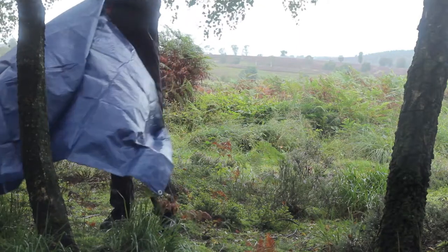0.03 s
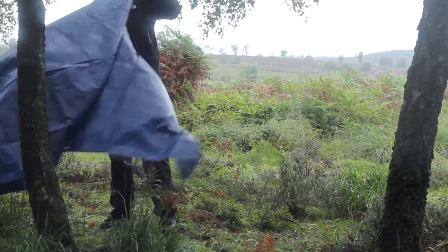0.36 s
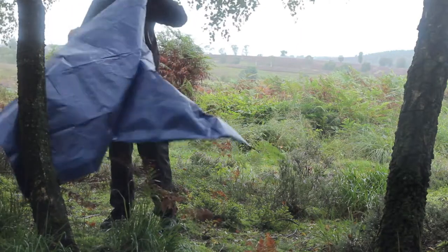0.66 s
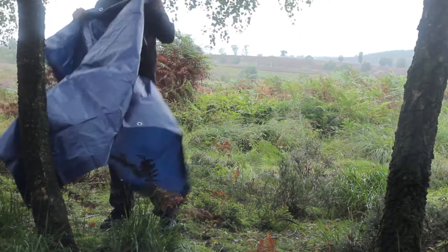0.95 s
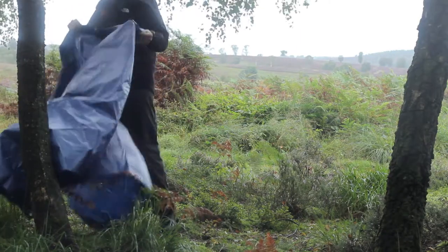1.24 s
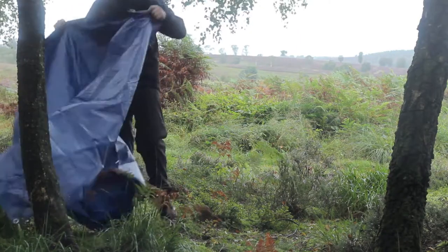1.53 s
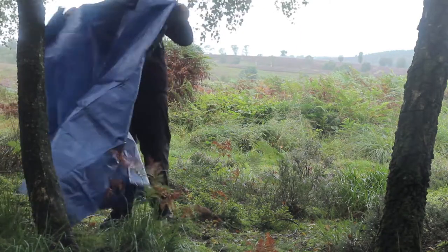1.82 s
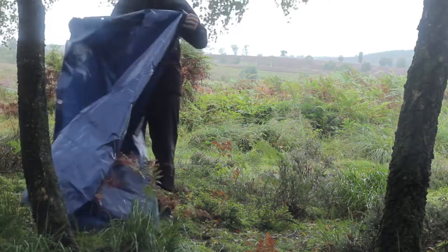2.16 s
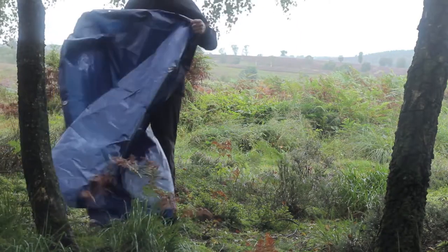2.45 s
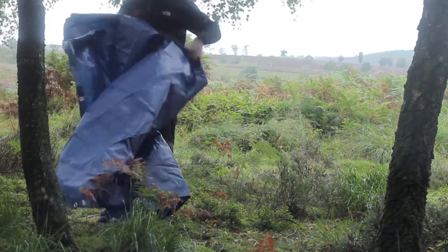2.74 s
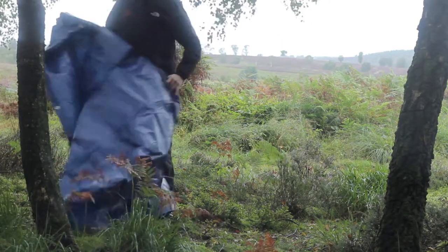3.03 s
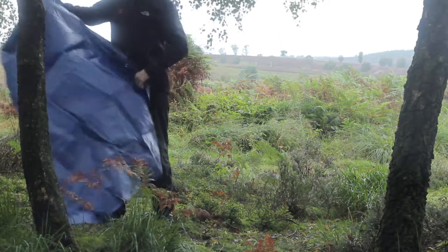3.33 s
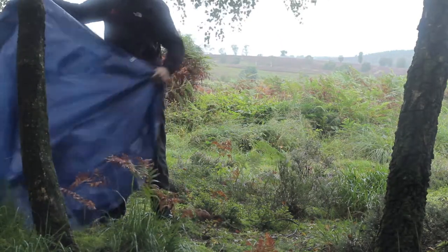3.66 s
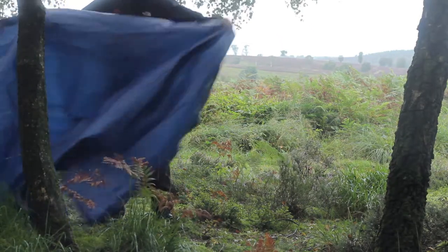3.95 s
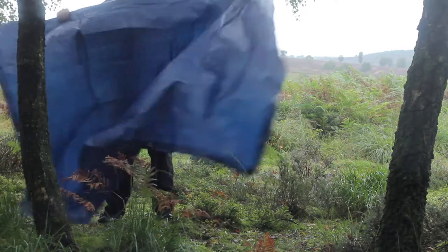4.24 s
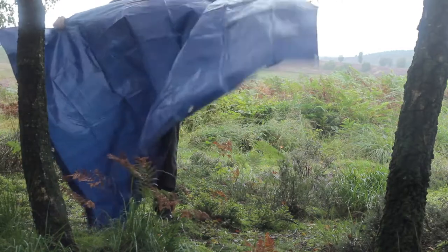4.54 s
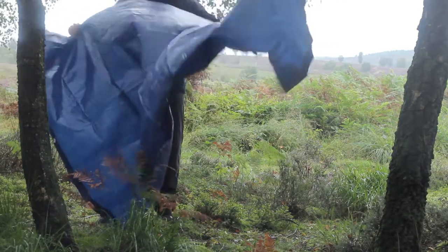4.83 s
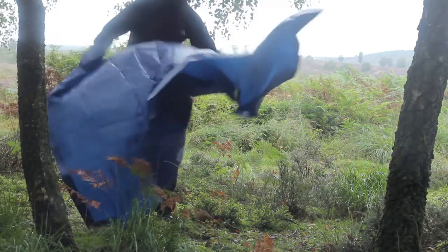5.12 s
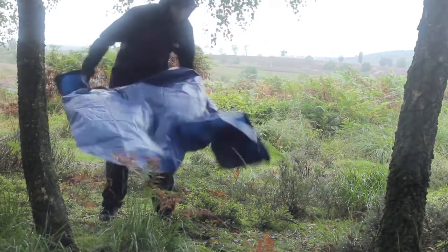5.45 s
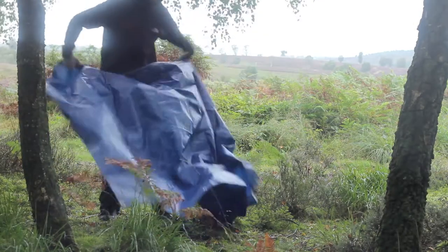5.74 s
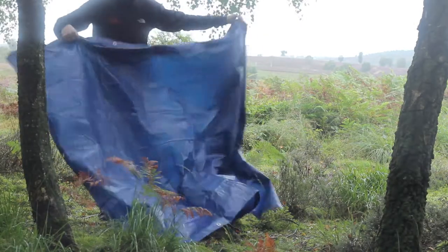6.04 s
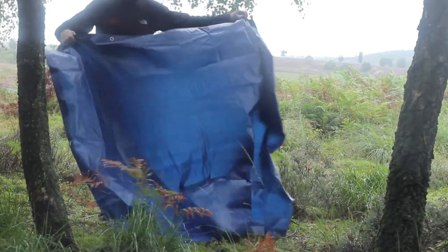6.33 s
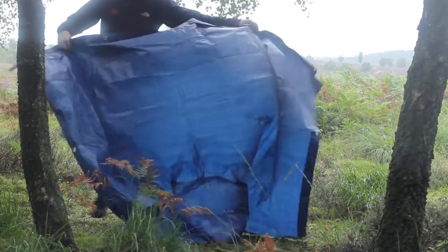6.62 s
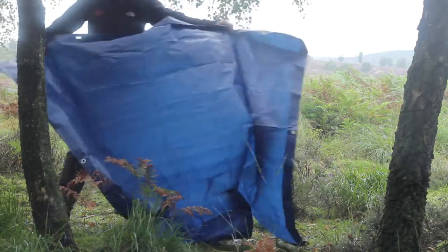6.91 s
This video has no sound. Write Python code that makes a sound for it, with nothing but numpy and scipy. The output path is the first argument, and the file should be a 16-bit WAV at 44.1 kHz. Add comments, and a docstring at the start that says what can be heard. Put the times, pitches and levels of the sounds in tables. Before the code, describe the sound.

A plastic tarp rustles and crackles in irregular swishes as someone pulls and shakes it open a few metres off, its creases giving occasional small snaps. Throughout, wind hits the microphone with a low, uneven rumble and dull thumps, easing briefly early on and growing stronger in the second half. A faint hiss of ferns lies underneath, out in open country.

```python
"""Gusty wind rumbles and thuds on the microphone as eddies hit it, out on an open heath.
A few metres off, a person shakes out a woven plastic tarp: the sheet rasps over itself and its
creases buckle in swarms of tiny clicks, with a few sharper snaps and ticks.
Bracken hisses behind. A fast limiter holds the peaks."""
import sys
import numpy as np
from scipy import signal
from scipy.fft import rfft, irfft, next_fast_len
from scipy.io import wavfile
from scipy.ndimage import uniform_filter1d, minimum_filter1d, map_coordinates

SR = 44100
rng = np.random.default_rng(int(sys.argv[2]) if len(sys.argv) > 2 else 0)


def to_wav(sig):
    """Store sig (one row per channel, or 1-D mono) as 16-bit WAV at the path in sys.argv[1].

    Samples outside -1..1 are clipped; the rate is SR.
    """
    pcm = np.clip(np.atleast_2d(sig), -1, 1) * 32767
    pcm = np.round(pcm).astype(np.int16)
    wavfile.write(sys.argv[1], SR, pcm.T)  # frames by channels


N = 316638

# spectra of ferns, wind rumble and plastic sheet: (frequency [Hz], relative density [dB])
BRACKEN_SPECTRUM = [(100, -36), (400, 11.5), (1000, 11), (2500, -18), (4500, -41), (7000, -13),
                    (15000, -35)]
RUMBLE_SPECTRUM = [(25, -25), (35, -40), (50, -12.5), (70, -3), (100, 0), (140, 0), (200, -2), (280, -7),
                   (400, -13.5), (560, -22.5)]
SHEET_SPECTRUM = [(200, -16), (400, -8.5), (800, -0.5), (1250, 0.5), (1950, -0.5), (2500, 0.5),
                  (3000, -4.5), (3600, -5.5), (4400, -12), (5600, -12.5), (6900, -9), (8300, -14),
                  (10000, -14.5), (15500, -24.5)]
# wind between gusts: (time [s], relative level [dB])
BASE_WIND = [(0.0, -24.5), (0.28, -32.5), (0.85, -23), (0.95, -46.5), (1.05, -43.5), (1.15, -31),
             (1.5, -31), (1.66, -44), (1.79, -45), (2.0, -35.5), (2.42, -33), (2.47, -60), (2.58, -39),
             (2.72, -42), (2.88, -40.5), (2.96, -28), (3.12, -30), (3.35, -22.5), (3.57, -39.5),
             (3.73, -31.5), (4.06, -27.5), (4.17, -31.5), (4.45, -24), (4.93, -30), (5.03, -35),
             (5.12, -26.5), (6.2, -29), (6.57, -32.5), (6.74, -29.5), (7.15, -25)]
# gusts: (start [s], length [s], relative level [dB], small-eddy share [dB])
WIND_GUSTS = [(0.032, 0.18, -23, -10.5), (0.306, 0.025, -21.5, -15.5), (0.41, 0.16, -22, -10),
              (0.645, 0.1, -20.7, -8), (0.76, 0.096, -24.5, -6), (1.068, 0.042, -24, -16.5),
              (1.14, 0.072, -27, -15), (1.208, 0.088, -22, -18), (1.36, 0.11, -23, -12),
              (1.808, 0.033, -25.5, -32), (1.96, 0.0076, -26.5, -13), (2.076, 0.035, -25.5, -24),
              (2.15, 0.1, -33, -19), (2.3, 0.064, -27.5, -13.5), (2.42, 0.018, -28, -15.5),
              (2.602, 0.04, -23.5, -11.5), (2.635, 0.062, -18.5, -12), (2.7, 0.055, -24, -20.5),
              (2.815, 0.028, -23, -19), (2.98, 0.03, -20.5, -12), (3.04, 0.025, -17, -14),
              (3.243, 0.15, -25, -9.5), (3.435, 0.018, -17, -10.5), (3.48, 0.021, -23, -11.5),
              (3.628, 0.013, -19.5, -12.5), (3.656, 0.011, -12, -16), (3.769, 0.042, -15, -13),
              (3.87, 0.041, -20.5, -13.5), (3.98, 0.069, -21.5, -10), (4.26, 0.14, -23.5, -13.5),
              (4.45, 0.14, -28.5, -9), (4.548, 0.14, -23, -6.5), (4.71, 0.06, -18.5, -11),
              (4.81, 0.07, -22, -14), (4.872, 0.06, -18.5, -12), (4.972, 0.026, -17.5, -13),
              (5.056, 0.11, -20.5, -9), (5.17, 0.17, -25.5, -10), (5.368, 0.04, -17.5, -10.5),
              (5.42, 0.13, -24, -4.5), (5.565, 0.058, -22.5, -8), (5.632, 0.062, -24.5, -2),
              (5.705, 0.075, -27.5, -2), (5.8, 0.015, -22.5, -5), (5.92, 0.17, -28.5, 1),
              (6.084, 0.047, -24.5, -10.5), (6.168, 0.027, -22, -5.5), (6.256, 0.038, -30, -19),
              (6.432, 0.023, -24, -10), (6.617, 0.044, -21, -11), (6.787, 0.14, -21, -9.5),
              (7.047, 0.22, -24, -5)]
# strongest single eddies: (time [s], relative peak [dB], speed over size [Hz])
STRONG_EDDIES = [(0.0389, -5.5, 160), (0.077, -9.5, 170), (0.151, -11, 180), (0.2096, -11, 150),
                 (0.339, -19, 114), (0.4492, -9, 180), (0.483, -13.5, 210), (0.581, -12.5, 140),
                 (0.667, -11, 150), (0.681, -7, 150), (0.694, -16, 210), (0.723, -12, 199),
                 (0.7645, -14, 270), (0.797, -10, 150), (0.815, -13, 200), (1.0759, -15.5, 138),
                 (1.114, -16, 114), (1.2215, -9.5, 113), (1.261, -12, 114), (1.449, -10, 135),
                 (1.5076, -13, 138), (1.823, -17.5, 126), (2.086, -17.5, 99), (2.22, -23, 130),
                 (2.636, -21, 115), (2.6814, -5, 235), (2.711, -13, 123), (2.792, -14.5, 126),
                 (2.9998, -11, 177), (3.2694, -14, 145), (3.366, -11, 190), (3.453, -13, 178),
                 (3.666, -6, 167), (3.784, -8.5, 140), (3.79, -8.5, 213), (3.9007, -8.5, 183),
                 (3.994, -11.5, 186), (4.0036, -8, 119), (4.0738, -10.5, 208), (4.126, -15.5, 114),
                 (4.28, -15.5, 141), (4.337, -15, 139), (4.5545, -2.5, 195), (4.585, -6.5, 190),
                 (4.6801, -4.5, 210), (4.755, -14, 130), (4.8841, -7.5, 191), (4.9177, 2, 171),
                 (4.938, -11, 168), (4.9812, -11.5, 229), (5.076, -8, 155), (5.088, -7.5, 230),
                 (5.1306, -6.5, 217), (5.173, -16, 190), (5.224, -14.5, 198), (5.282, -16, 205),
                 (5.389, -8, 165), (5.4297, -14, 228), (5.4674, -15, 297), (5.4787, -2.5, 155),
                 (5.4863, -8, 263), (5.5074, -17, 220), (5.5251, -7, 180), (5.5495, -0.5, 350),
                 (5.635, -15, 230), (5.6654, -12.5, 278), (5.685, -9.5, 210), (5.7464, -16, 300),
                 (5.8051, -13, 260), (5.8255, -9, 222), (5.9335, -14, 256), (6.1085, -14, 273),
                 (6.2635, -8.5, 146), (6.4525, -6, 186), (6.646, -9, 155), (6.816, -5.5, 206),
                 (6.8367, -8.5, 140), (6.864, -15, 168), (6.8885, -14, 252), (6.934, -11.5, 135),
                 (7.064, -11, 185), (7.0909, -8, 213)]
# tiny swirls at the microphone port: (time [s], relative peak [dB], frequency [Hz])
PORT_SWIRLS = [(2.667, -22, 850), (2.682, -23, 1200), (4.555, -26, 845), (4.587, -14.5, 1180),
               (4.605, -21, 810), (4.642, -27, 1030), (4.666, -36, 1400), (5.089, -27, 1400),
               (5.13, -33, 930), (5.506, -22, 1080), (5.5518, -17.5, 1020), (5.638, -38, 950),
               (5.657, -31, 1100), (5.826, -41, 1050)]
# small hard kinks: (time [s], relative peak [dB])
KINK_TICKS = [(1.8577, -38), (2.0777, -31), (2.4943, -37), (3.0505, -34), (5.0955, -40), (6.299, -36),
              (6.663, -36)]
# creases snapping through: (time [s], relative peak [dB], crispness [dB])
CREASE_SNAPS = [(0.901, -29, -12), (1.232, -28, -10), (1.2985, -25, 8), (1.49, -26, -7), (1.5333, -24.5, 1),
                (2.059, -31, 4), (2.2192, -27.5, 2), (2.5373, -29, -8), (2.817, -34, -9), (3.7, -22, -2),
                (4.268, -26.5, -6), (4.914, -28, -11), (6.414, -24.5, -4.5), (6.876, -31.5, -5)]
# crumpling, from bunched up to flying open: (time [s], crease-click share [dB])
CREASE_SHARE = [(3.9, -7.5), (4.3, -4), (5.9, -3.5)]
# constant sliding of sheet on sheet: (time [s], relative level [dB], crispness [dB])
SHEET_SLIDING = [(0.15, -58, -4.5), (0.4, -53.5, -6.5), (1.03, -54, -5.5), (1.35, -49.5, -3.5),
                 (1.7, -50, -4.5), (1.92, -54.5, -6), (2.3, -54, -5), (2.6, -50, -6), (2.97, -52, -5.5),
                 (3.42, -51, -3), (3.52, -56.5, -6.5), (3.7, -47, -6), (4.2, -53.5, -5.5), (5.42, -56, -4),
                 (5.62, -64, -6.5), (6.3, -54.5, -5), (6.55, -53, -5), (7.15, -57, -4.5)]
# pulls and shakes dragging the folds: (start [s], length [s], relative level [dB], crispness [dB])
SHEET_PULLS = [(0.275, 0.1, -48, -10), (0.53, 0.16, -51.5, -8.5), (0.888, 0.043, -48, -7),
               (1.125, 0.076, -58, -1), (1.45, 0.038, -49, -6), (1.68, 0.1, -50.5, -1.5),
               (1.97, 0.15, -54, -1.5), (2.355, 0.071, -48, -4), (2.69, 0.06, -54.5, -1),
               (2.8, 0.04, -53.5, 3), (3.09, 0.14, -51.5, -3.5), (3.3, 0.15, -51, -7),
               (3.635, 0.029, -42, -5.5), (3.745, 0.03, -45, -6), (3.86, 0.11, -48, -4),
               (3.975, 0.1, -45, -5), (4.245, 0.021, -48, -11), (4.32, 0.096, -52.5, -9),
               (4.85, 0.08, -57.5, 0), (5.34, 0.094, -53.5, -5.5), (5.785, 0.17, -61, -1.5),
               (5.96, 0.075, -53.5, -8), (6.38, 0.11, -49.5, -6.5), (6.7, 0.031, -52.5, -11),
               (6.79, 0.05, -55, -8)]


def undb(db):
    """Decibels to gain."""
    return 10 ** (np.asarray(db) / 20)


def unit(x):
    """Scale to rms 1."""
    return x / np.sqrt(np.mean(x ** 2))


def steady(x, span_s):
    """Scale to rms 1 over each span; faster detail stays."""
    size = int(span_s * SR / 2)
    return x / np.sqrt(uniform_filter1d(uniform_filter1d(x ** 2, size), size) + 1e-12)


def curves(table):
    """Table columns, interpolated to every sample."""
    times_s, *columns = np.transpose(table)
    return [np.interp(np.arange(N) / SR, times_s, column) for column in columns]


def walk(rate_hz):
    """Smooth random curve, rms 1."""
    points = rng.standard_normal(N // 16)
    return unit(map_coordinates(points, [np.arange(N) * rate_hz / SR], order=2, mode="wrap"))


def spectrum_db(spectrum, hz):
    """Read a spectrum on a log-frequency axis."""
    points_hz, db = np.transpose(spectrum)
    return np.interp(np.log(hz + 1), np.log(points_hz), db)


def colour(x, spectrum):
    """Minimum-phase filter; rolls off below the spectrum's first point."""
    size = next_fast_len(N + SR // 8, real=True)
    size += size % 2
    hz = np.arange(size // 2 + 1) * SR / size
    gain = undb(spectrum_db(spectrum, hz)) * (hz + 1) / np.hypot(hz + 1, spectrum[0][0])
    cepstrum = irfft(np.log(gain))
    cepstrum[1:size // 2] *= 2
    cepstrum[size // 2 + 1:] = 0
    return irfft(rfft(x, size) * np.exp(rfft(cepstrum)))[:N]


def butter(x, hz, kind, order=2):
    """Butterworth filter."""
    return signal.sosfilt(signal.butter(order, hz, kind, fs=SR, output="sos"), x)


def brighten(x, treble_db, split_hz=4400):
    """Zero-phase treble shelf."""
    low = signal.sosfiltfilt(signal.butter(3, split_hz, fs=SR, output="sos"), x)
    return low + undb(treble_db) * (x - low)


def add(out, at_s, sound):
    """Mix a sound in, in place."""
    start = int(np.clip(at_s * SR, 0, N - 1))
    out[start:start + len(sound)] += sound[:N - start]


def swells(table, base_db, base_tone_db, attack_s, release_s):
    """Events rise, hold and decay over a base. Returns (level [dB], power-weighted tone [dB])."""
    t = np.arange(N) / SR
    power = undb(base_db) ** 2
    weighted_tone = power * base_tone_db
    for start_s, length_s, db, tone_db in table:
        age_s = t[t < length_s + 8 * release_s]
        envelope = np.minimum(age_s / attack_s, 1) * np.exp(-np.maximum(age_s - length_s, 0) / release_s)
        event_power = (envelope * undb(db)) ** 2
        add(power, start_s, event_power)
        add(weighted_tone, start_s, event_power * tone_db)
    return 10 * np.log10(power), weighted_tone / power


def bracken(level_db=-57.5):
    """Ferns and leaves hiss softly."""
    hiss = unit(colour(rng.standard_normal(N), BRACKEN_SPECTRUM))
    return hiss * undb(level_db + walk(2.57))


def breeze(gust_db, level_db=-45, band_hz=(30, 100), lull_below_db=-33):
    """Big slow eddies keep up a soft rumble, weaker in lulls."""
    rumble = unit(butter(rng.standard_normal(N), band_hz, "bandpass", order=3))
    lull_db = 0.17 * np.minimum(gust_db - lull_below_db, 0)
    return rumble * undb(level_db + walk(1.0) + lull_db)


def turbulence(gust_db, speed_db, knee_hz=150, fall_db_per_octave=17, patchy_db=2.5, trim_db=-1):
    """Eddies of all sizes sweep the microphone: slow air rumbles, fast air sputters."""
    bursts = 1.4 * np.tanh(walk(110) / 1.4)
    tilt_db_per_octave = np.clip(speed_db, -18, 3)
    out = np.zeros(N)
    for hz in 25 * 2 ** (np.arange(14) / 2):
        octaves = np.log2(hz / knee_hz)
        # steep fall beyond the smallest lasting eddies
        fall_db = fall_db_per_octave * max(np.log2(hz / RUMBLE_SPECTRUM[-1][0]), 0)
        tilt_db = tilt_db_per_octave * np.clip(octaves, -.3, 2.5)
        gain = undb(spectrum_db(RUMBLE_SPECTRUM, hz) - fall_db + tilt_db) * np.sqrt(hz)
        edges_hz = [hz / 2 ** .25, hz * 2 ** .25]
        band = unit(butter(rng.standard_normal(N), edges_hz, "bandpass", order=3))
        sputter = undb(patchy_db * (1.76 + max(octaves, 0)) * bursts)
        out += gain * unit(steady(band, span_s=0.042) * sputter)
    return steady(out, span_s=0.16) * undb(gust_db + trim_db)


def swirls(width_cycles=0.9, lead_s=.006, trim_db=-1):
    """Tiny fast swirls cross the port, a cycle or two each."""
    out = np.zeros(N)
    t = np.arange(int(2 * lead_s * SR)) / SR - lead_s
    for at_s, db, hz in PORT_SWIRLS:
        envelope = np.exp(-(hz * t / width_cycles) ** 2)
        swing = np.cos(2 * np.pi * (hz * t + rng.random()))
        add(out, at_s - lead_s, undb(db + trim_db) * envelope * swing)
    return out


def stray_eddies(gust_db, speed_db, count=90, usual_hz=190, max_hz=270, octaves_per_db=0.6):
    """Random lesser eddies, as strong and fast as their wind. Columns as in STRONG_EDDIES."""
    jitter, strength = rng.random((count, 2)).T
    at = ((np.arange(count) + jitter) / count * (N - 1)).astype(int)
    peak_db = gust_db[at] - 0.5 + 3 * strength
    hz = np.minimum(usual_hz * 2 ** (octaves_per_db * speed_db[at]), max_hz)
    return np.column_stack([at / SR, peak_db, hz])


def buffets(eddies, wake_gain=0.72, wake_hz=120, vent_hz=100, port_hz=2400, lead_s=.03, trim_db=-4.5):
    """A vortex core thuds in one pressure swing, sharper if fast and small; a weaker wake follows."""
    out = np.zeros(N)
    t = np.arange(int(2 * lead_s * SR)) / SR - lead_s
    for at_s, db, hz in eddies:
        rotation = np.exp(2j * np.pi * rng.random())
        lag_s = rng.uniform(.003, .00653)
        core = 1 / (1 + 2j * np.pi * hz * t) ** 2
        wake = 1 / (1 + 2j * np.pi * min(wake_hz, hz) * (t - lag_s)) ** 2
        thud = np.real(rotation * (core + wake_gain * wake)) * np.hanning(len(t))
        add(out, at_s - lead_s, undb(db + trim_db) * thud / np.abs(thud).max())
    # slow pressure leaks through the vent; the tiniest swirls average out over the port
    vented = butter(out, vent_hz, "highpass", order=1)
    return butter(vented, port_hz, "lowpass")


def wind(waver_db=2, waver_hz=19, usual_share_db=-10, low_cut_hz=23):
    """Gusts ride on the base wind, driving rumble and thuds; the microphone loses the deepest bass."""
    gust_db, small_share_db = swells(WIND_GUSTS, *curves(BASE_WIND), base_tone_db=-15.5,
                                     attack_s=0.002, release_s=0.014)
    gust_db += waver_db * np.tanh(walk(waver_hz))
    speed_db = small_share_db - usual_share_db
    rumble = butter(breeze(gust_db) + turbulence(gust_db, speed_db), low_cut_hz, "highpass")
    sputter = swirls()
    eddies = np.vstack([STRONG_EDDIES, stray_eddies(gust_db, speed_db)])
    return rumble + sputter + buffets(eddies)


def kinks(decay_s=0.00091, tail_db=-15, tail_s=0.005, band_hz=(4500, 11500), trim_db=-1):
    """A hard kink pops out with a dry tick; the weave around it shivers."""
    out = np.zeros(N)
    t = np.arange(SR // 40) / SR
    envelope = np.exp(-t / decay_s) + undb(tail_db) * np.exp(-t / tail_s)
    for at_s, db in KINK_TICKS:
        tick = butter(rng.standard_normal(len(t)) * envelope, band_hz, "bandpass", order=1)
        add(out, at_s, undb(db + trim_db) * tick / np.abs(tick).max())
    return out


def snaps(decay_s=0.0031, tail_db=-17, tail_s=0.043, ragged_db=3.5, usual_crisp_db=-7, trim_db=7):
    """A stiff crease flips with a crack; the sheet crackles raggedly after it."""
    out = np.zeros(N)
    t = np.arange(SR // 12) / SR
    envelope = np.exp(-t / decay_s) + undb(tail_db) * np.exp(-t / tail_s)
    crackle = rng.standard_normal(N) * undb(ragged_db * walk(400))
    for (at_s, db, crisp_db), grain in zip(CREASE_SNAPS, np.array_split(crackle, len(CREASE_SNAPS))):
        crack = brighten(grain[:len(t)] * envelope, crisp_db - usual_crisp_db)
        add(out, at_s, undb(db + trim_db) * crack / np.abs(crack).max())
    return colour(out, SHEET_SPECTRUM)


def clicks(per_s, spread_db):
    """Impulses of random time, size and sign, rms 1."""
    fires = rng.random(N) < per_s / SR
    size = np.minimum(rng.exponential(size=N), 4)
    return unit(fires * undb(spread_db * size) * rng.choice([-1, 1], N))


def shiver(impulses, decay_s, tail_gain):
    """Each click shivers briefly through the surrounding sheet."""
    t = np.arange(SR // 25) / SR
    response = rng.standard_normal(len(t)) * np.exp(-t / decay_s)
    energy = signal.fftconvolve(impulses ** 2, response ** 2 / np.sum(response ** 2))[:N]
    return impulses + tail_gain * np.sqrt(np.abs(energy)) * rng.standard_normal(N)


def tarp(crinkle_db=2.5, tick_db=-14, clump_db=0.7, facing_db=0.5, usual_crisp_db=-5, trim_db=4.5):
    """The sliding weave rasps; creases buckle in swarms and clumps as folds roll through."""
    rustle_db, crisp_db = swells(SHEET_PULLS, *curves(SHEET_SLIDING), attack_s=0.011, release_s=0.029)
    share_db, = curves(CREASE_SHARE)
    weave = clicks(per_s=9000, spread_db=-1.5)
    crinkle = unit(shiver(clicks(per_s=380, spread_db=4.5), decay_s=0.0013, tail_gain=0.99))
    ticks = shiver(clicks(per_s=38, spread_db=8), decay_s=0.0005, tail_gain=0.8)
    treble_ticks = unit(butter(ticks, 7000, "highpass"))
    creases = undb(share_db) * (undb(crinkle_db) * crinkle + undb(tick_db) * treble_ticks)
    folds = undb(walk(85) + clump_db * walk(28))
    sheet = steady(colour((weave + creases) * folds, SHEET_SPECTRUM), span_s=0.16)
    # each fold faces another way, so its treble comes and goes
    sheet = brighten(sheet, -facing_db * walk(70), split_hz=8900)
    sheet = brighten(sheet, crisp_db - usual_crisp_db - facing_db * walk(70))
    return sheet * undb(rustle_db + trim_db)


def scene():
    """Mono mix of wind, tarp and heath."""
    return (wind() + tarp() + snaps() + kinks() + bracken())[None]


def record(dry, ceiling=.39, hold_s=0.0028, top_hz=15750):
    """A fast limiter holds the strongest thuds; a steep low-pass cuts the top."""
    size = int(hold_s * SR)
    gain = np.minimum(1, ceiling / (np.abs(dry) + 1e-9))
    gain = uniform_filter1d(minimum_filter1d(gain, size), size)
    lowpass = signal.ellip(10, .1, 80, top_hz, fs=SR, output="sos")
    return signal.sosfilt(lowpass, dry * gain)


dry = scene()
out = record(dry)
to_wav(out)
```